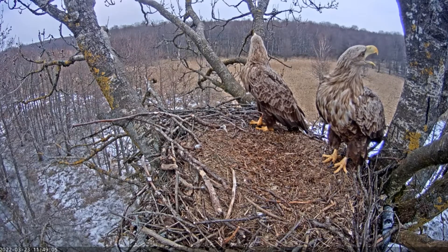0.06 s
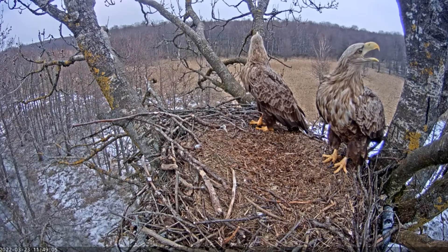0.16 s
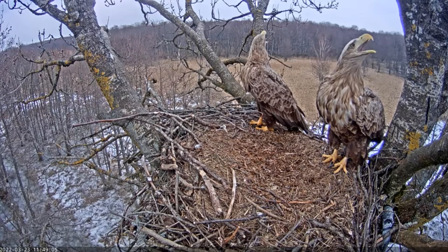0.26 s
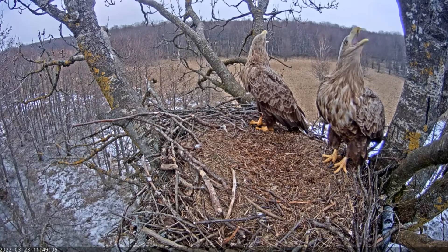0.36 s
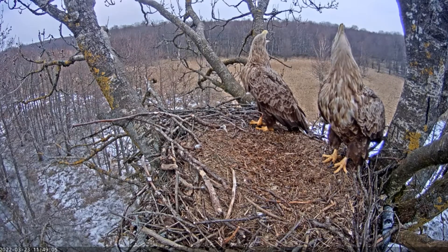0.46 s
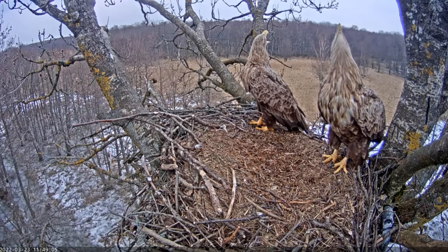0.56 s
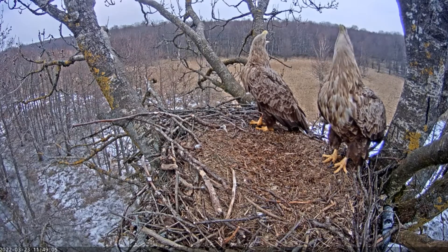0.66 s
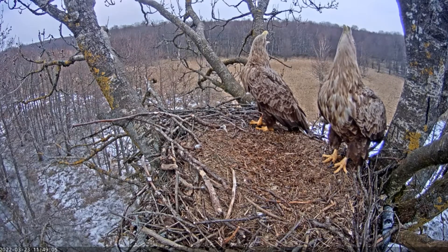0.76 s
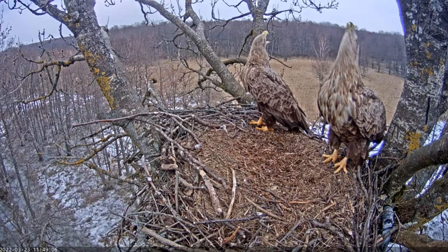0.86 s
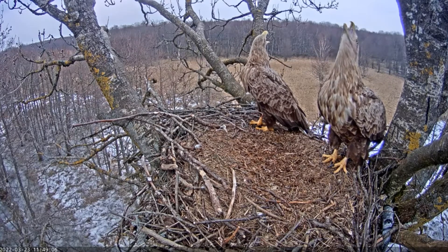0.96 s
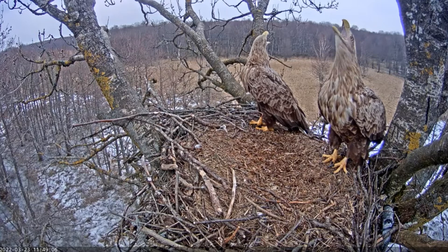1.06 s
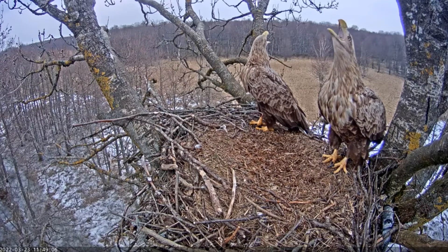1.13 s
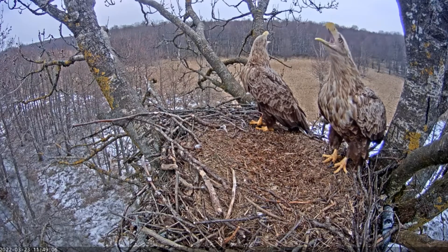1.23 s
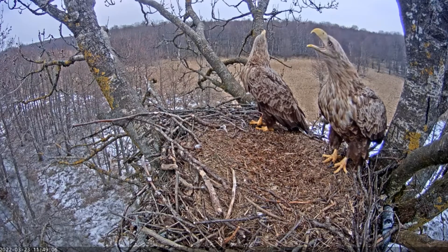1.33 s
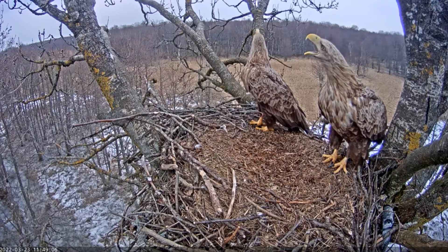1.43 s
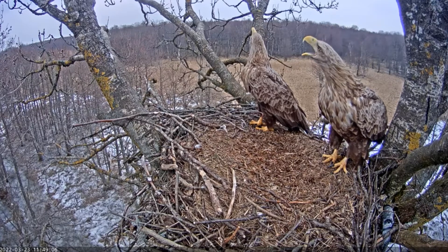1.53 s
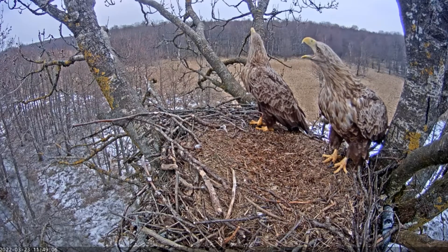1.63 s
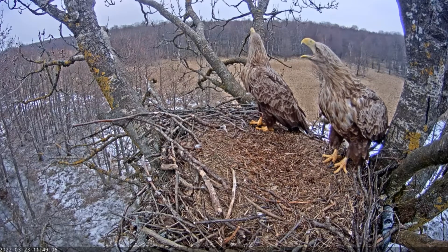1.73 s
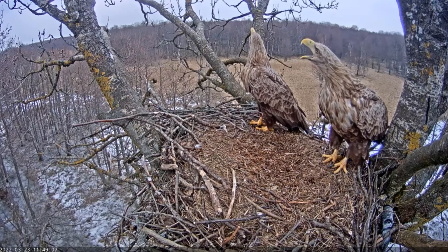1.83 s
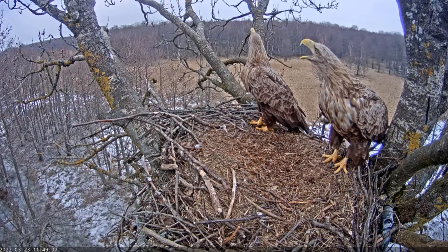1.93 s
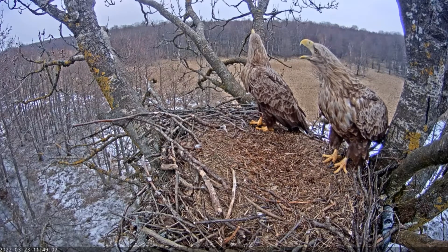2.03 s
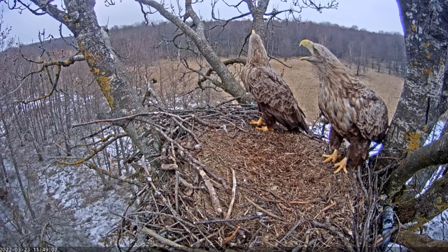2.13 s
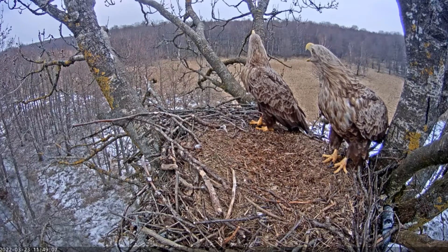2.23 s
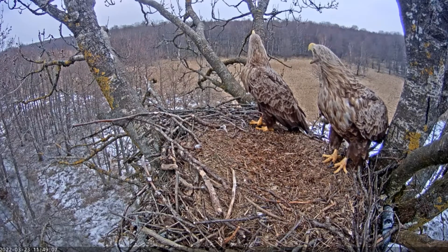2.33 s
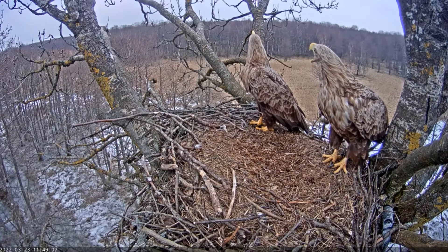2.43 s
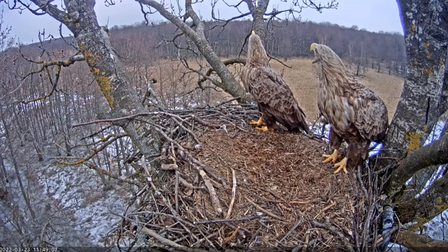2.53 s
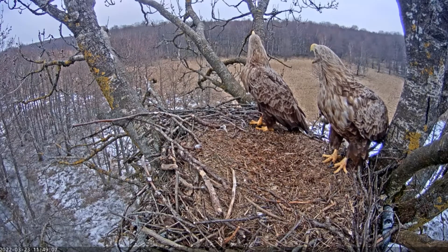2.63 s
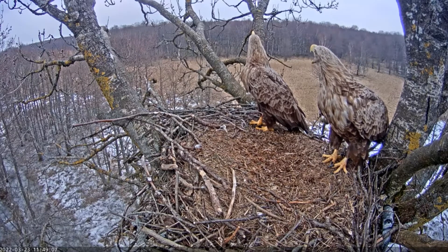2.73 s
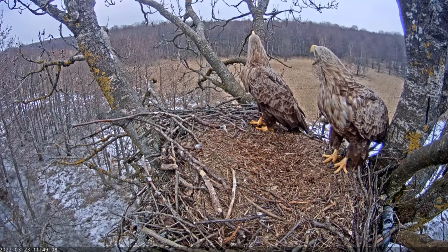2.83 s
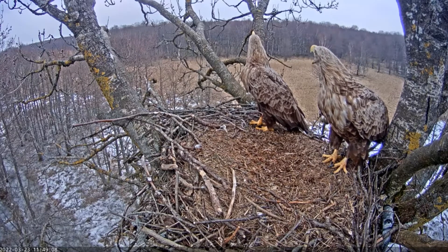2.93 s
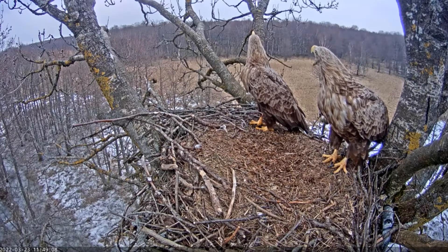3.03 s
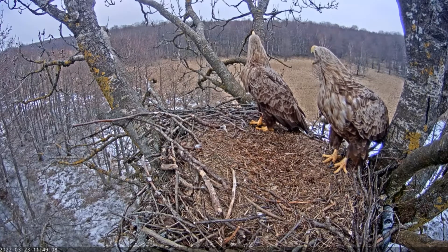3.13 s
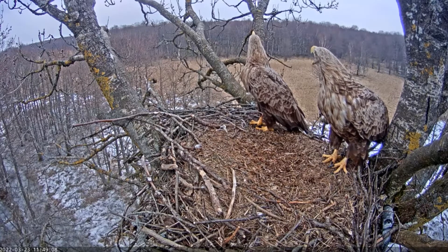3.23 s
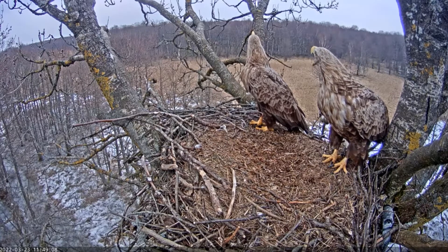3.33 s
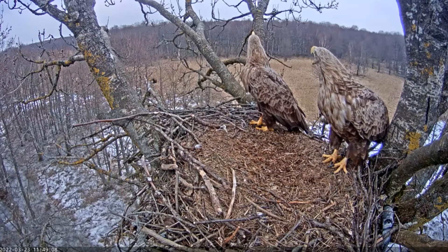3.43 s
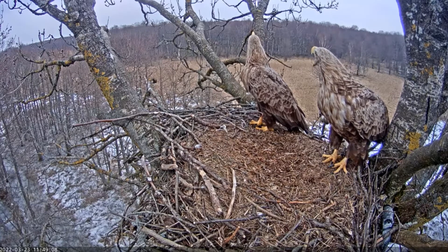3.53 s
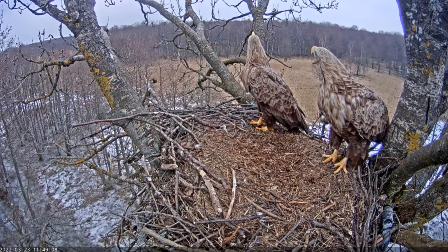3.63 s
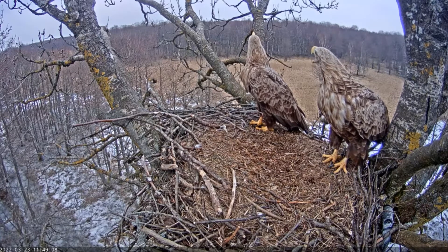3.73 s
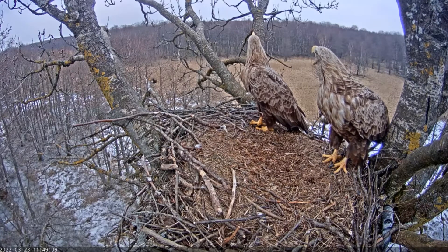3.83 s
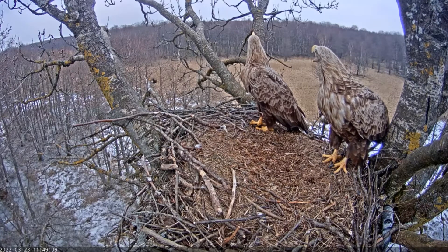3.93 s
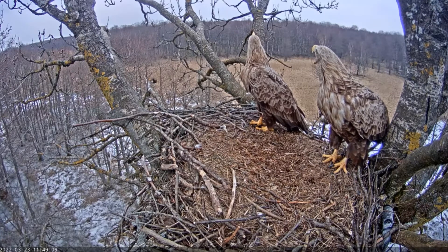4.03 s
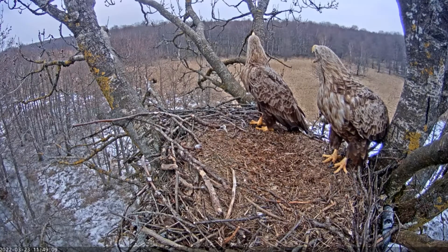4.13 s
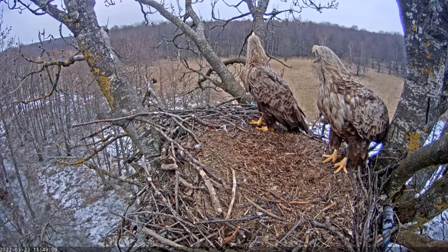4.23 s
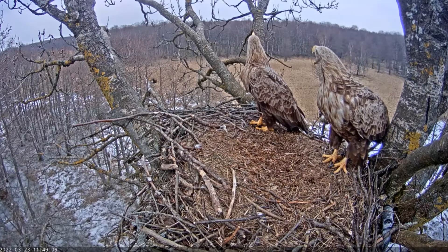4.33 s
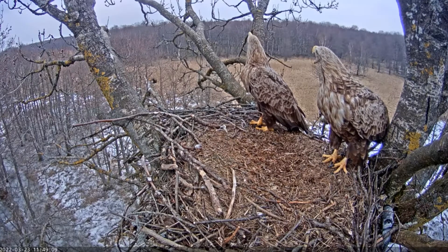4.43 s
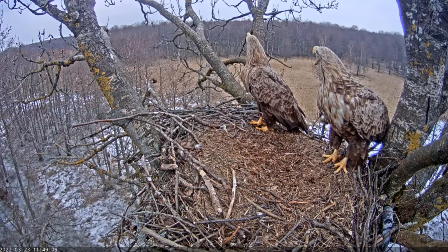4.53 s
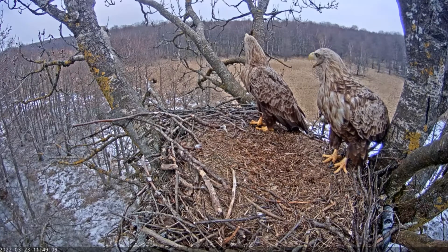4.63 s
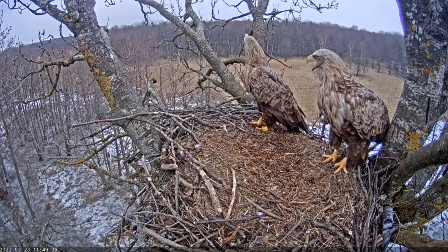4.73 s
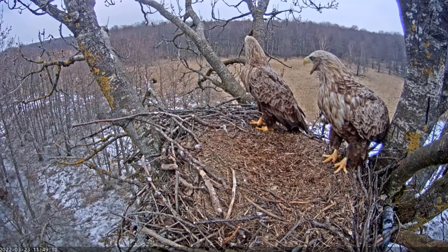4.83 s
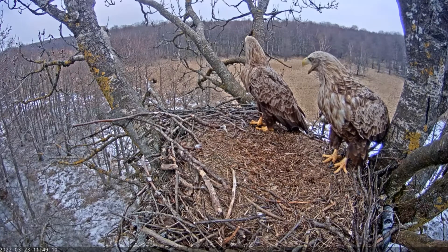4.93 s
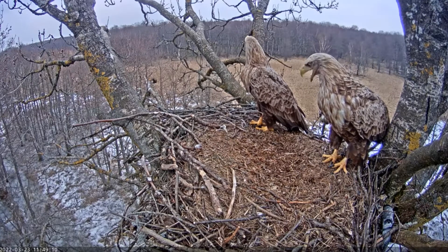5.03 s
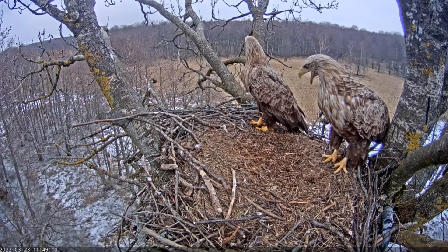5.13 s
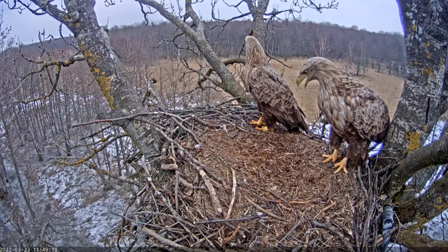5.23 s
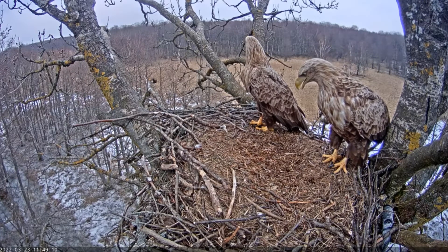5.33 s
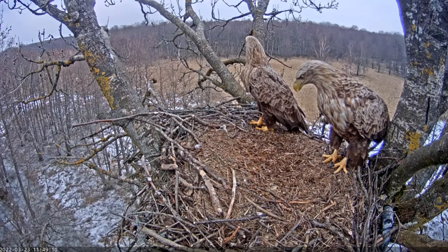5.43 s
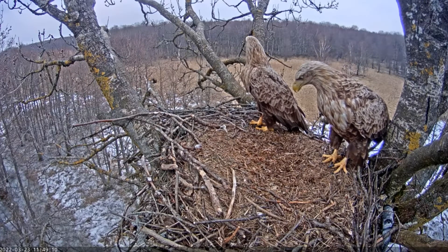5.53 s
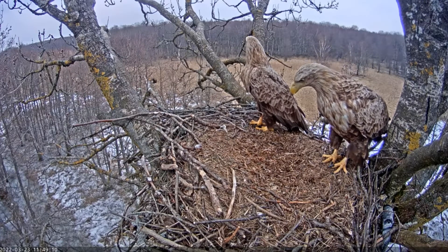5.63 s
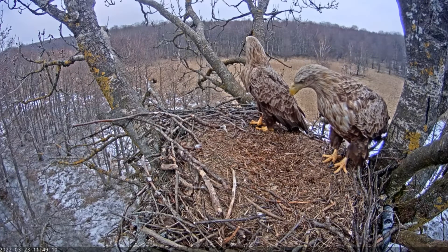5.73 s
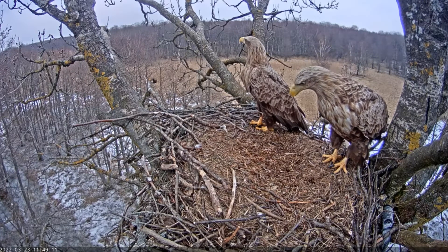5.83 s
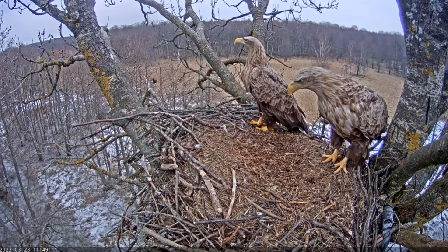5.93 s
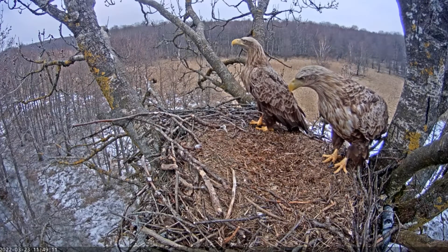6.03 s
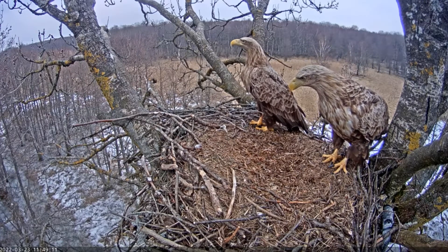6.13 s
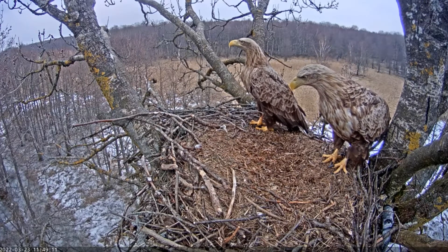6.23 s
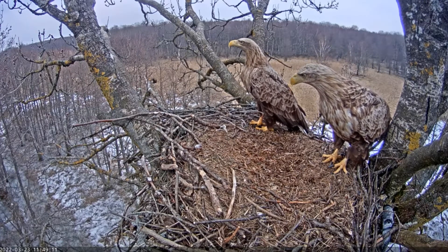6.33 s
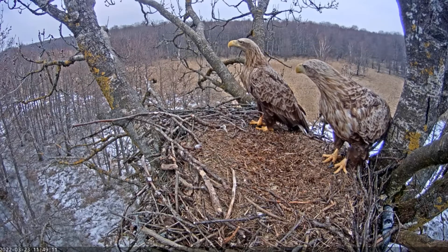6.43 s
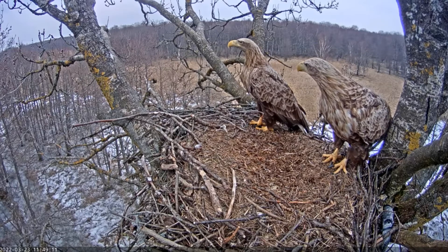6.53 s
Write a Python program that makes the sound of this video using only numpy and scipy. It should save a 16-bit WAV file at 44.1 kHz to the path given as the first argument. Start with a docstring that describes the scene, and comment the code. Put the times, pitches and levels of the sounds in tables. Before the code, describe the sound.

Two large eagles call together on a nest in open woodland. One gives high falling notes with hoarse ends; the nearer starts with broken squeaks and clucks, then yelps about four times a second. It finishes with two longer, lower cries. Forest echoes fade into quiet rumbling air and a faint feather rustle. A close outdoor microphone slightly overloads on the loudest yelps.

```python
"""High, falling notes of one white-tailed eagle are heard first, duetting with its mate at the nest.
The nearer bird starts haltingly, then yelps: each note breaks upward and closes in throaty clucks.
It ends on two drawn-out cries. Vibrating membranes make the voices, ringing gullet modes the clucks.
Decaying noise makes the forest echoes, shaped noise the rustle and rumbling air; loud yelps saturate."""
import sys
import numpy as np
from scipy import signal
from scipy.fft import rfft, irfft, next_fast_len
from scipy.io import wavfile
from scipy.ndimage import map_coordinates

SR = 44100
rng = np.random.default_rng(int(sys.argv[2]) if len(sys.argv) > 2 else 0)


def digitize_waveform(pressure):
    """Quantize a signal to 16-bit integers and store it at the path in sys.argv[1].

    Rows of a 2-D input are taken as channels; values are limited to [-1, 1].
    """
    field = np.atleast_2d(pressure).T
    bounded = np.clip(field, -1, 1)
    quanta = np.round(bounded * 32767).astype(np.int16)
    wavfile.write(sys.argv[1], SR, quanta)


N = 289737

# Yelps of the nearer bird: (register break [s], rise before it [s], hold after it [s], bend [Hz],
# level [dB], overtones [dB], cluck [dB], rebound pitch [Hz], rebound level [dB])
YELP_NOTES = [(1.177, 0.022, 0.038, 228.5, -5.5, -17, -12, 1494, -19),
              (1.416, .026, 0.034, -18, -6, -15, -15.5, 1687, -18),
              (1.642, 0.036, 0.024, 249.5, -7, -15, -12, 1613, -27.5),
              (1.860, 0.034, 0.024, 1.5, -9, -7.5, -16, 1877, -12.5),
              (2.084, 0.034, 0.024, 1.5, -7, -13.5, -11, 1800, -15.5),
              (2.310, 0.033, 0.024, 8, -7.5, -14, -11.5, 1808, -24.5),
              (2.550, 0.041, 0.022, 11.5, -8.5, -10, -11.5, 1580, -21),
              (2.779, 0.037, 0.024, 23.5, -8.5, -7.5, -9.5, 1499, -26.5),
              (3.013, 0.033, 0.027, 21, -9.5, -9, -8.5, 1500, -27),
              (3.253, 0.033, 0.028, 22, -7.5, -12.5, -8.5, 1493, -29.5),
              (3.494, .035, .029, 2.5, -8, -10.5, -11.5, 1854, -17),
              (3.729, 0.038, 0.028, -14, -8, -10, -12, 1848, -14),
              (4.015, 0.057, 0.02, -22, -8.5, -13, -15, 1474, -12),
              (4.261, .043, .027, -14, -8.5, -12.5, -17.5, 1440, -12),
              (4.500, 0.038, 0.029, -8, -7.5, -15, -15.5, 1458, -12.5),
              (4.757, .039, 0.029, -7.5, -7.5, -14, -15, 1459, -10.5)]
# Echoes from the limbs; the raised beaks send them much of the treble:
# (frequency [Hz], level [dB], t60 [s])
LIMB_ECHOES = [(300, -35, .12), (1570, -15, 0.2), (2370, -14, 0.027), (4080, -3.5, 0.11),
               (6850, -3.5, 0.17)]
# Echoes from the forest: (frequency [Hz], level [dB], t60 [s])
FOREST_ECHOES = [(100, -26.5, 0.78), (700, -35.5, 0.47), (1360, -29, 2.7), (2320, -26.5, 0.63),
                 (3560, -19.5, 0.82), (5500, -17.5, 0.67), (7000, -26, 2)]
GROWL_S = 0.015  # yelps and cries start with a growl this long


def amp(db):
    """Level to amplitude ratio: 20 dB is a factor of ten."""
    return 10 ** (np.asarray(db) / 20)


def unit(x):
    """Normalisation to an rms of 1."""
    return x / np.sqrt(np.mean(x ** 2) + 1e-20)


def along(points, hz):
    """Interpolation of (Hz, value) points on a logarithmic frequency axis."""
    f, v = np.transpose(points)
    return np.interp(np.log(hz + 1), np.log(f + 1), v)


def curves(rows, at):
    """Linear interpolation of every column after the first, read at the given places."""
    places, *cols = np.transpose(rows)
    return [np.interp(at, np.sort(places), c) for c in cols]


def wobble(rate, size):
    """Band-limited fluctuation: a smooth random curve with rate knots a second."""
    knots = rng.standard_normal(size + 4)
    return map_coordinates(knots, [np.arange(size) * min(rate / SR, 1)])


def step(x, width):
    """Smooth transition from 0 to 1 as x passes zero."""
    return .5 + .5 * np.tanh(x / width)


def blend(a, b, share):
    """Linear crossfade from a to b as share goes from 0 to 1."""
    return a + (b - a) * share


def filtered(x, response):
    """Linear filtering: the spectrum of x times a response of frequency."""
    m = next_fast_len(x.shape[-1] + 8192)  # padding keeps the end from wrapping round
    spectrum = rfft(x, m) * response(np.fft.rfftfreq(m, 1 / SR))
    return irfft(spectrum, m)[..., :x.shape[-1]]


def noise(spectrum, size):
    """Coloured noise: white noise shaped by a spectrum, at an rms of 1."""
    white = rng.standard_normal(size)
    return unit(filtered(white, lambda hz: amp(along(spectrum, hz))))


def add(track, s, sound):
    """Superposition: mix a sound into the track at time s."""
    i = round(s * SR)
    part = sound[max(-i, 0):N - i]
    track[max(i, 0):][:len(part)] += part


def flutter(since, hz, settle):
    """Damped oscillation: the membrane's dying shudder after a register break."""
    return (since > 0) * np.exp(-abs(since) / settle) * np.sin(2 * np.pi * hz * since)


def syrinx(hz, db, overtones_db, rough, jitter=.06, shimmer=.5, waver=0.015, doubling=0.63,
           rasp_db=-11, air_db=-38, dull=0.86, chest_hz=1350):
    """Self-sustained membrane vibration: harmonic when steady, period-doubled and raspy when rough."""
    # strength of an overtone by its own frequency: (frequency [Hz], level [dB])
    throat = [(1500, 6), (2000, -0.5), (2420, -0.5), (2750, -21), (3000, -2.5), (3600, -10.5), (3900, -13),
              (4600, -17), (5200, -16.5), (5900, -19), (6500, -28.5), (7300, -36.5)]
    # air through the throat: (frequency [Hz], relative level [dB])
    rasp = [(100, 5.5), (600, -6), (900, -22), (1600, 8), (2400, -6), (2750, -20.5), (3400, -2.5),
            (6000, -24.5), (7300, -31.5)]
    n = len(hz)
    rough = np.clip(rough, 0, 1)
    low_register = np.clip((chest_hz - hz) / 150, 0, 1)
    hz = hz * (1 + jitter * rough * wobble(900, n) + waver * wobble(170, n))
    phase = 2 * np.pi * np.cumsum(hz) / SR

    tone = np.sin(phase)
    for k in range(2, 8):
        # soft low notes lose their upper overtones
        soft_db = dull * (k - 2) * low_register * np.minimum(db + 18, 0)
        partial_db = overtones_db + soft_db + along(throat, k * hz) + 1.9 * wobble(70, n)
        tone += amp(partial_db) * np.sin(k * phase)

    # in the low register every second cycle is weaker
    subharmonic = doubling * low_register * np.sqrt(rough) * np.sin(phase / 2)
    tone *= 1 + subharmonic + shimmer * rough * np.tanh(wobble(760, n))

    breath = (amp(air_db) + rough * amp(rasp_db)) * noise(rasp, n)
    from_ends = np.minimum(np.arange(n), np.arange(n)[::-1])
    edge = np.clip(from_ends / (0.002 * SR), 0, 1)  # 2 ms fades
    return edge * amp(db) * (np.sqrt(2) * tone + breath)


def yelps(break_s=0.0022, growl_overtones_db=0, chest_overtones_db=-7, chest_rough=0.11,
          head_rough=0.093, break_rough=.5, shudder=0.082, surge_db=3.0, waver_db=1.5):
    """Register break: a growl clears into a rising, swelling note, jumps upward, holds and is cut off."""
    growl_hz, chest_hz, head_hz = 767.4, 1325, 1491.3  # first sound, before the break, after it
    climb_hz, sag_hz = 368.3, 94  # climb of the low register, final drop of the high one
    growl_db, crescendo_db = -17, 15  # growl under the full level, swell up to the break
    release_db_per_s = 3500.5
    out = np.zeros(N)
    for snap, rise_s, hold_s, bend_hz, level_db, overtones_db, *_ in YELP_NOTES:
        t = np.arange(-rise_s, hold_s + 0.01, 1 / SR)
        rise = np.minimum(1 + t / rise_s, 1)
        held = np.clip(t / hold_s, 0, 1)
        voiced = step(t + rise_s - GROWL_S, 0.0012)
        upper = step(t + break_s, break_s)
        closed = step(t - hold_s, 0.0019)
        ring = flutter(t, hz=188, settle=0.0019)

        growl_share = np.minimum((t + rise_s) / GROWL_S, 1)
        chest = blend(growl_hz, chest_hz - climb_hz * (1 - rise), growl_share)
        head = head_hz + bend_hz * held - sag_hz * held ** 4
        hz = blend(chest, head, upper) * (1 + shudder * ring)

        db = level_db + blend(growl_db, -crescendo_db * (1 - rise), voiced)
        db = db - release_db_per_s * np.maximum(t - hold_s, 0)
        db = db - surge_db * ring + waver_db * wobble(120, len(t))

        bright = blend(chest_overtones_db, overtones_db, upper)
        bright = blend(growl_overtones_db, bright, voiced)
        clear = blend(chest_rough, head_rough, upper)
        rough = blend(0.94, clear, voiced * (1 - closed))  # rough in the growl and at the closing
        rough = rough + break_rough * np.exp(-abs(t) / 0.0016)
        note = syrinx(hz, db, bright, rough, jitter=0.077, shimmer=0.55, waver=.008)
        add(out, snap - rise_s, note)
    return out


def clucks(ring_db=-10, puff_db=-12, puff_t60=0.11, rattle_db=3, low_hz=90):
    """Impulsive modal excitation: a pop rings the gullet's low modes and lets out a rattling puff."""
    # modes of the gullet: (frequency [Hz], level [dB], t60 [s])
    gullet = [(146, -7, 0.13), (163, 5, 0.033), (274, -0.5, 0.04), (565, 5.5, 0.014), (671.7, 4.5, 0.02),
              (1340, -2, 0.014)]
    # the puff of air: (frequency [Hz], relative level [dB])
    puff_spectrum = [(30, -15), (120, 7.5), (700, -2), (1000, -16), (1700, -9), (3000, -26), (7000, -42)]
    # the throat closes in a run of clucks: (delay after the note's end [s], level step [dB])
    closing_run = [(.004, -1), (0.0237, 3), (.042, -18), (.062, -21)]
    # opening notes that close before the voice has caught: (end [s], cluck level [dB])
    false_starts = [(.319, -17.5), (.604, -9), (.944, -7)]
    out, t = np.zeros(N), np.arange(SR // 8) / SR
    attack = 1 - np.exp(-t / .001)
    yelp_ends = [(snap + hold_s, db) for snap, _, hold_s, *_, db, _, _ in YELP_NOTES]
    for end, cluck_db in false_starts + yelp_ends:
        for delay, step_db in closing_run:
            ring = np.zeros(len(t))
            for hz, level, t60 in gullet:
                # each cluck strikes the modes a little differently
                decay = amp(level + rng.normal(0, 3.9) - 60 * t / t60)
                mode_hz = hz * np.exp(rng.normal(0, .12))
                ring += decay * np.sin(2 * np.pi * mode_hz * t)
            rattle = amp(rattle_db * wobble(170, len(t)))
            puff = amp(-60 * t / puff_t60) * unit(rattle * noise(puff_spectrum, len(t)))
            pop = attack * (amp(puff_db) * puff - amp(ring_db) * ring)
            add(out, end + delay, amp(cluck_db + step_db) * pop)
    high_pass = signal.butter(2, low_hz, "high", fs=SR, output="sos")
    return signal.sosfilt(high_pass, out)


def squeaks(arch=0.084, rough=0.76, overtones_db=-13):
    """Re-excitation: the membrane catches again for a few milliseconds."""
    # stray squeaks and grunts of the first and last notes:
    # (middle [s], length [s], peak pitch [Hz], level [dB])
    strays = [(0.328, 0.013, 1586, -13), (.596, 0.0099, 5240, -17.5), (0.6198, 0.0067, 1456, -10),
              (0.916, 0.019, 5150, -29.5), (0.9294, .008, 1690, -10), (0.943, .008, 1490, -9),
              (5.116, 0.0089, 440, -26), (5.425, .016, 433, -25.5)]
    rebound_s, rebound_length_s = 0.014, 0.02  # the squeak that follows each yelp
    rebounds = [(snap + hold_s + rebound_s, rebound_length_s, hz, db)
                for snap, _, hold_s, *_, hz, db in YELP_NOTES]
    out = np.zeros(N)
    for s, length, hz, db in strays + rebounds:
        u = np.linspace(-1, 1, int(length * SR))
        squeak = syrinx(hz * (1 - arch * u ** 2), db, overtones_db, rough)
        add(out, s - length / 2, np.cos(u * np.pi / 2) * squeak)
    return out


def cries(full_share=0.58, arch_db=3, opening_db=2, growl_db=-1, growl_overtones_db=-3,
          clear_rough=.05, growl_rough=.85, tail_rough=.12, waver_db=1):
    """Frequency glide in one register: an arched call after a short growl, clearest at the crest."""
    # arched cries of both birds: (crest [s], rise before it [s], fall after it [s], crest pitch [Hz],
    # depth of the arch [0-1], level [dB], change at the ends [dB], overtones [dB])
    arches = [(0.309, 0.042, .011, 1240, .18, -12.5, 2, -1),
              (4.885, .065, 0.057, 1854, .13, -21.5, -7.5, -9),
              (5.055, 0.066, 0.052, 1279, .35, -15.5, -4.5, -0.5),
              (5.365, .084, 0.054, 1221, 0.32, -18, -5, 3.5)]
    # the wide-open beak colours the cries: (frequency [Hz], gain [dB])
    gape = [(1200, 0), (1900, 1), (2450, 2.5), (3100, 1.5), (3650, 4), (4300, 0), (6000, 4.5), (7200, -4.5)]
    rise_power, fall_power = 2.1, 1.6  # shape of the arch on either side of the crest
    out = np.zeros(N)
    for crest, rise_s, fall_s, crest_hz, depth, level_db, ends_db, overtones_db in arches:
        t = np.arange(-rise_s, fall_s, 1 / SR)
        u = t / np.where(t < 0, rise_s, fall_s)
        slack = abs(u) ** np.where(u < 0, rise_power, fall_power)
        edge = step(abs(u) - full_share, 0.07)
        growl = step(GROWL_S - rise_s - t, 0.0027)

        hz = crest_hz * (1 - depth * slack)
        db = level_db - arch_db * slack + ends_db * edge + growl_db * growl
        db = db + waver_db * wobble(90, len(t))
        bright = overtones_db + opening_db * u + growl_overtones_db * growl
        rough = clear_rough + tail_rough * edge + growl_rough * growl
        fade = np.clip((fall_s - t) / 0.0076, 0, 1)
        cry = syrinx(hz, db, bright, rough, waver=0.0067, doubling=0.39, air_db=-32, rasp_db=-8.5)
        add(out, crest - rise_s, fade * cry)
    return filtered(out, lambda hz: amp(along(gape, hz)))


def replies(full_share=0.57, catch_db=6, lead_overtones_db=-6, top_overtones_db=-8, overtones_db=-7,
            tail_overtones_db=-2, clear_rough=.12, break_rough=0.63, tail_rough=1.0, shudder=0.012,
            pull=.8, waver_db=1.6):
    """Resonance locking: a soft lead-in leaps up, then falls, clinging to a throat mode, and ends hoarse."""
    # notes of the mate: (register break [s], hold after it [s], top pitch [Hz], level [dB])
    reply_notes = [(0.024, 0.046, 2150, -12.5), (.268, 0.058, 2300, -17), (.520, .057, 2485, -8),
                   (.777, .056, 2480, -8), (1.023, .052, 2470, -7.5), (1.277, .043, 2330, -9.5),
                   (1.535, .042, 2420, -11.5), (1.806, 0.055, 2500, -13.5), (2.073, .058, 2450, -13.5),
                   (2.335, .052, 2480, -13), (2.622, .035, 2150, -12), (2.867, .045, 2230, -13),
                   (3.131, 0.048, 2500, -14), (3.415, .057, 2510, -15), (3.687, 0.057, 2430, -17.5),
                   (3.978, 0.06, 2460, -18.5), (4.257, .055, 2490, -15.5), (4.588, 0.024, 2046, -12.5)]
    lead_s, lead_hz, lead_climb_hz = .033, 1810, 127.5  # the soft lead-in
    rest_hz = 1585  # pitch that the fall tends to
    lead_db, lead_swell_db = -4.5, 3  # lead-in under the full level, its swell
    swell_db = 6.5  # swell of the high note
    tail_db, tail_db_per_s = -4.5, 503  # drop and decay of the hoarse tail
    # near this throat resonance the falling note is held and sounds louder
    lock_hz, lock_width_hz, lock_db = 2081, 100, 6.5
    out = np.zeros(N)
    for snap, hold_s, top_hz, level_db in reply_notes:
        t = np.arange(-lead_s, hold_s + 0.048, 1 / SR)
        lead = np.maximum(-t, 0) / lead_s
        held = np.maximum(t, 0) / hold_s
        upper, closed = step(t, .0015), step(t - hold_s, 0.007)
        strain = np.clip(1 - held / full_share, 0, 1)

        high = rest_hz + (top_hz - rest_hz) * np.exp(-held ** 2.4)
        lock = upper * np.exp(-((high - lock_hz) / lock_width_hz) ** 2)
        hz = blend(lead_hz - lead_climb_hz * lead, blend(high, lock_hz, pull * lock), upper)
        hz = hz * (1 + shudder * flutter(t, hz=248, settle=0.0085))

        catch = np.exp(-(t / 0.006 + 1) ** 2)  # a brief surge just before the leap
        db = level_db + blend(lead_db - lead_swell_db * lead ** 2, -swell_db * strain, upper)
        db = db + catch_db * catch + lock_db * (lock - 1)
        db = db + tail_db * closed - tail_db_per_s * np.maximum(t - hold_s, 0)
        db = db + waver_db * wobble(120, len(t))

        bright = blend(overtones_db, top_overtones_db, strain)
        bright = blend(bright, tail_overtones_db, closed)
        bright = blend(lead_overtones_db, bright, upper) - catch_db * catch
        rough = clear_rough + break_rough * strain * upper + tail_rough * closed
        fade_in = np.minimum((t + lead_s) / .008, 1)
        note = syrinx(hz, db, bright, rough, jitter=0.036, waver=0.011, rasp_db=-14, air_db=-35)
        add(out, snap - lead_s, fade_in * note)
    return out


def echoes(x, place):
    """Diffuse reverberation: a noise tail with its own level and exponential decay at each frequency."""
    hz, t, z = signal.stft(rng.standard_normal(2 * SR), SR, nperseg=256)
    db, t60 = curves(place, hz[:, None])
    energy = SR * t60 / (2 * np.log(1000))  # of a decay by 60 dB in t60
    decaying = z * amp(db - 60 * t / t60) / np.sqrt(energy)
    tail = signal.istft(decaying, SR, nperseg=256)[1]
    return signal.fftconvolve(x, tail)[:N]


def feather_rustle():
    """Friction noise: feathers rustle under a fluctuating envelope."""
    # swell of the rustle: (time [s], mean level [dB])
    swell = [(5.4, -95), (5.55, -63), (5.79, -61.5), (5.83, -58), (5.87, -62), (5.92, -74)]
    # its colour: (frequency [Hz], relative level [dB])
    feathers = [(1500, -9), (3500, 3.5), (5500, 14.5), (6600, 10.5), (7300, -10.5)]
    db = curves(swell, np.arange(N) / SR)[0] + 2 * wobble(90, N)
    return amp(db) * noise(feathers, N)


def quiet_air(level_db=-50):
    """Stationary broadband noise: the air rumbles, strongest at low frequencies."""
    # (frequency [Hz], relative level per Hz [dB])
    air = [(12, -33.5), (20, -11.5), (32, -23), (90, -11), (247, -16), (280, -19), (869, -38.5),
           (1200, -36.5), (7240, -57), (9410, -87), (15900, -120)]
    return amp(level_db) * noise(air, N)


def scene():
    """Superposition of both birds, their echoes, the rustle and the quiet air."""
    birds = yelps() + replies() + cries() + squeaks() + clucks()
    reverberant = echoes(birds, LIMB_ECHOES) + echoes(birds, FOREST_ECHOES)
    mono = birds + reverberant + feather_rustle() + quiet_air()
    return np.array([mono, mono])


def record(dry, hardness=14):
    """Band limiting and saturation: a microphone rounds the loudest peaks; its mid range leans left."""
    # (frequency [Hz], left minus right [dB])
    balance = [(300, 0), (600, 3), (850, 0.5), (1100, 4), (1600, 4), (2100, 3), (3300, 2.5), (4700, 1),
               (7000, 1)]
    mic_hz, top_hz = 7100, 15800  # steep microphone roll-off, final cutoff
    ceiling = .79
    heard = filtered(dry, lambda hz: 1 / np.sqrt(1 + (hz / mic_hz) ** 50))
    saturated = heard / (1 + np.abs(heard / ceiling) ** hardness) ** (1 / hardness)

    def pan(hz):
        """Level difference to opposite gain changes left and right."""
        lean = np.tanh(along(balance, hz) * np.log(10) / 40)
        return np.array([1 + lean, 1 - lean])

    stereo = filtered(saturated, pan)
    return filtered(stereo, lambda hz: hz < top_hz)


dry = scene()
out = record(dry)
digitize_waveform(out)
```